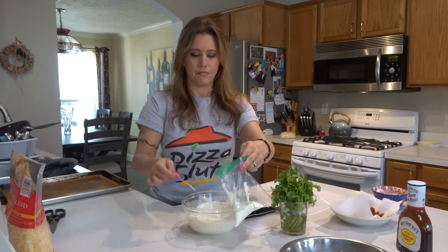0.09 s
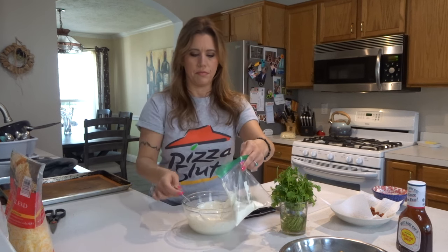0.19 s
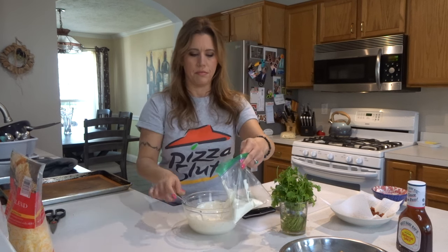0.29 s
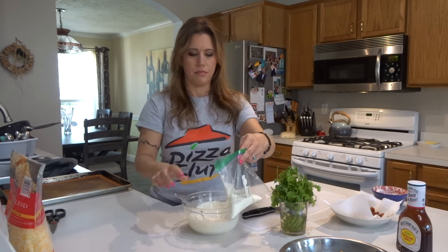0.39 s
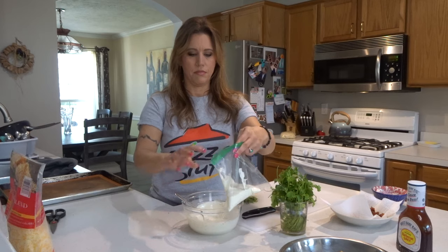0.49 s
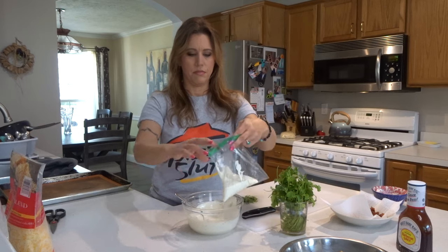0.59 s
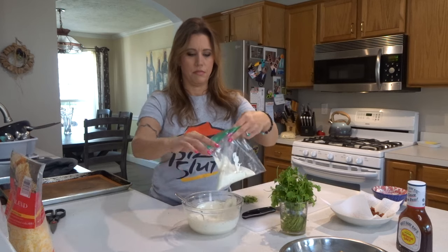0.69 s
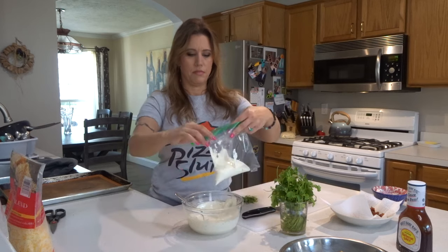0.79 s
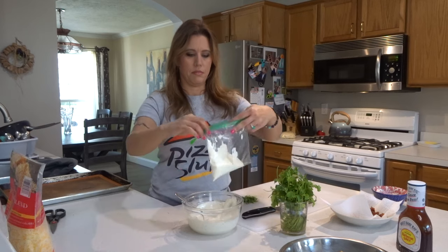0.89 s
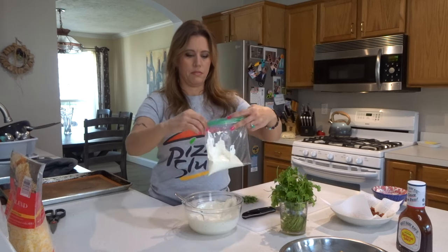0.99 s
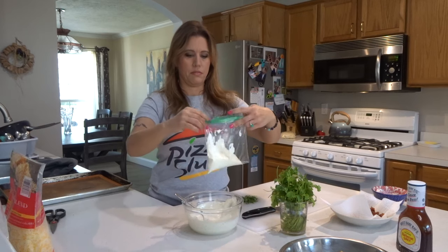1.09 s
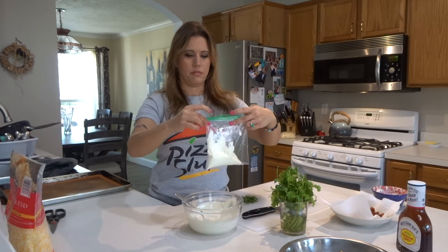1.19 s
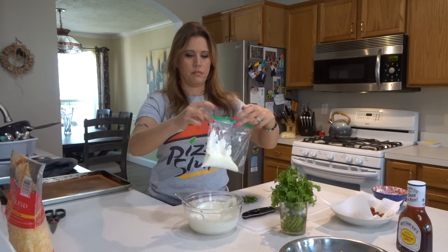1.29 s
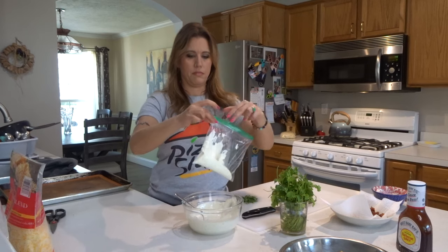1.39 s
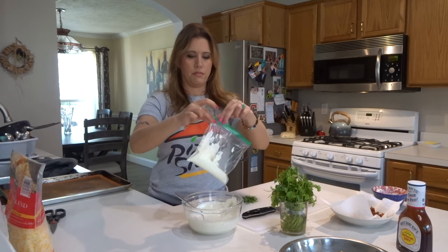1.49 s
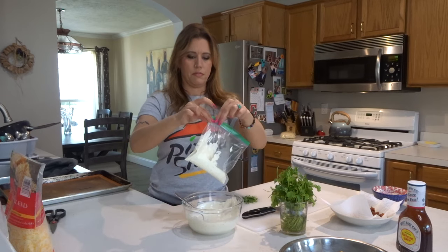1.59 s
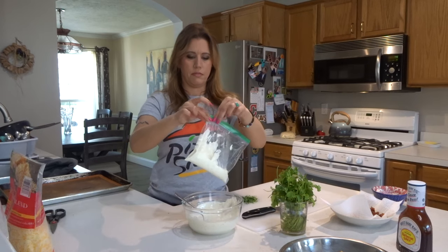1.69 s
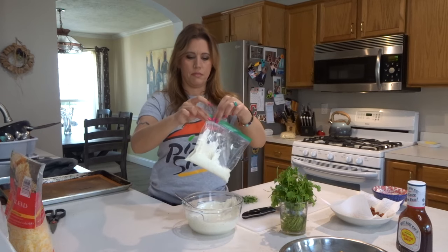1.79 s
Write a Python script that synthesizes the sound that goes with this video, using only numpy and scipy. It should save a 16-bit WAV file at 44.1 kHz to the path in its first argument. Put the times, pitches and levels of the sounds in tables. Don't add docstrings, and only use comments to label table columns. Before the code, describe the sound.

A spoon clinks against a glass bowl at about 0.24 seconds, chattering in several touches within 0.06 seconds, with a faint counter thump and a bright ring damped near 0.5. From 0.6 to 0.9 a plastic bag snaps and crinkles briskly, sharpest near 0.7 and 0.83. Lighter crackles follow, clustering around 1.2, then sparse ticks and a tiny squeak near 1.5. Close stereo, reflective kitchen, soft hum.

```python
import sys
import numpy as np
from scipy import signal
from scipy.fft import rfft, irfft, next_fast_len
from scipy.io import wavfile

SR = 44100
rng = np.random.default_rng(int(sys.argv[2]) if len(sys.argv) > 2 else 0)


def amplitude_ratio(level_db):
    exponent = np.asarray(level_db, float) / 20
    return 10 ** exponent


def waveform_to_disk(signal):
    frames = np.transpose(np.atleast_2d(signal))
    scaled = np.clip(frames, -1, 1) * 32767
    samples = np.round(scaled).astype(np.int16)
    wavfile.write(sys.argv[1], SR, samples)


N = 79380

# start_s, crack_db, clank_db, thud_db
SPOON_CONTACTS = [
    (0.2380, -11.5, -29, -37.5),
    (0.2431, -7, -24, -40.5),
    (0.2454, -4, -27.5, -49),
    (.2520, -10, -34.5, -33),
    (0.2622, -12, -51, -37.5),
    (.2770, -43, -34.5, -36),
    (0.2951, -8.5, -34, -52),
]
# start_s, pitch_hz, level_db, t60_s, left_lead_rad
GLASS_RINGS = [(.2520, 2796.3, -24, .7, .8), (.25214, 2809, -26.5, .7, -.7), (.2520, 2815, -19, .05, 0),
               (.2520, 1579, -36, .5, .2), (.2520, 1561, -39, .3, 0), (.2456, 4290, -30, .75, 1),
               (.24572, 4302, -33, .75, -1.4), (.2456, 4334, -37, .5, 1.9), (.2456, 4370, -25, .05, 0),
               (.2615, 4320, -20, .08, .3), (.2945, 4300, -17, .09, -.4), (.2450, 6151, -33, .45, -1),
               (.2450, 6138, -37, .5, -1.9), (.2450, 6175, -32, .12, 0), (.2450, 3790, -36, .1, 0),
               (.2520, 3295, -41, .4, .4), (.2520, 9322, -47, .18, 2), (.2456, 10685, -44, .2, -2)]
# start_s, pitch_hz, level_db, t60_s, left_lead_rad
COUNTER_HUMMING = [
    (.240, 133, -32.5, 0.432, 0.0081),
    (.250, 194, -39.5, 0.6, 0),
    (0.267, 367, -39, 0.65, 0),
    (.245, 304, -41.5, 0.56, 0),
    (0.21, 497, -46, 0.51, 0),
    (.245, 676, -36, .35, 0),
    (.25, 827, -39, .35, .2),
]
# pitch_hz, level_db, t60_s
CLANK_MODES = [(2060, -11, .025), (2918, -9, .02), (3144, -13, .025), (3295, -8, .025), (3790, -9, .025),
               (4125, -8, .02), (4330, -2, .03), (5650, -13, .02), (6150, -8, .03), (6500, -13, .015),
               (6950, -13, .02), (9310, -13, .025), (10660, -8, .025)]
# pitch_hz, level_db, t60_s
COUNTER_MODES = [(142.4, -16, 0.057), (296, -2.5, 0.022), (361, -12, 0.06), (416.7, -2.5, 0.031),
                 (490, 1.5, 0.051), (585, -4.5, 0.042), (660, -7, 0.032), (810, 0.5, 0.038),
                 (957, -8, 0.087), (1100, -22, 0.027)]
# pitch_hz, level_db
CRACK_COLOR = [(110, -30), (450, -3), (1200, -9), (2200, -10), (4500, -3), (5000, -20), (6300, -7),
               (7800, -24), (10700, -13)]
# start_s, peak_db, panel_pitch_hz, treble_over_panel_db
BAG_SNAPS = [(0.61, -32, 3140, -8), (0.624, -26, 3440, -6.5), (0.64, -29.5, 1534, -16),
             (0.6864, -28, 1800, -22), (0.6965, -24, 1580, -25), (0.698, -12.5, 2200, -10),
             (0.7088, -25.5, 2940, -19), (0.7280, -26.5, 2840, 5.5), (0.7573, -35, 3340, 8),
             (.762, -31, 2950, 7), (.7686, -28, 2680, 4), (.786, -30, 4760, 6), (0.801, -24, 3000, 5),
             (0.8143, -30, 3630, -12), (0.8331, -16.5, 3430, 0.5), (0.8429, -19, 2050, 0),
             (.849, -28, 2890, 7), (0.859, -26, 2890, 2), (0.8735, -45, 2950, -1.5),
             (0.9317, -30, 2930, 13), (0.9945, -34.5, 4940, 9), (1.0595, -37, 2900, -16),
             (1.1311, -27, 3380, 1), (1.1913, -34.5, 3000, 4.5), (1.2075, -25.5, 3240, -18),
             (1.221, -30, 3000, -11), (1.2855, -37, 3640, -15), (1.4997, -35, 3815, -5),
             (1.5302, -36.5, 2213, -1.5), (1.6683, -34.5, 2230, 1.5),
             (0.594, -47, 2860, -5), (0.6605, -37, 2000, -0.5), (.6775, -34, 1800, 0),
              (0.7022, -24.5, 2180, -17), (.7130, -32, 2000, -14), (.7160, -47, 2420, -11),
              (.7428, -36, 2250, 7), (0.766, -31, 3020, 8.5), (.8097, -46.5, 3000, -4),
              (0.8568, -27, 3040, 0), (0.88, -32, 1950, -9.5), (0.8924, -33, 2880, -7),
              (.9057, -47, 2200, -6), (0.9232, -33, 2560, 2), (1.0787, -37, 3280, 9),
              (1.0948, -33, 3350, -0.5), (1.114, -42, 3000, -5), (1.1610, -38, 1900, 4),
              (1.1960, -41, 2980, 10), (1.2023, -33, 3560, -12), (1.2169, -28.5, 3320, -8.5),
              (1.2288, -36.5, 3230, -12), (1.2342, -33, 2860, -19), (1.262, -34, 4260, -4)]
# pitch_hz, level_db
TICK_COLOR = [(800, -43), (2000, -5.5), (7500, -1.5), (11000, -7.5)]
# start_s, rise_s, fall_db_per_s, peak_db
HAND_STROKES = [(0.607, 0.018, 602, -43.5), (.69, 0.0086, 399, -36.5), (.745, 0.0215, 300, -40),
                (0.789, 0.021, 208, -42), (0.822, 0.025, 698, -31.5), (0.904, 0.038, 400, -46),
                (.97, 0.023, 497.5, -47), (1.033, 0.032, 247, -45.5), (1.07, 0.032, 296, -47),
                (1.187, 0.018, 600, -43.5), (1.206, 0.026, 702, -43.5), (1.25, 0.033, 404, -53.5),
                (1.522, 0.026, 175, -50.5), (1.649, 0.014, 303, -55)]
# pitch_hz, level_db_per_hz
FILM_COLOR = [(500, 5.5), (1100, 0), (1800, -1), (3400, -0.5), (4500, -2), (8000, -7), (11000, -10.5)]
# pitch_hz, t60_s
KITCHEN_T60 = [(150, 0.416), (600, 0.66), (2000, 0.66), (5000, 0.64), (11000, 0.34)]
# pitch_hz, likeness (0 to 1)
LEFT_RIGHT_LIKENESS = [(60, .98), (250, .96), (500, .9), (1000, .8), (4000, .4), (11000, .1)]
# pitch_hz, level_db_per_hz
AIR_COLOR = [(18, -45), (30, -18.5), (60, -6), (81, -16), (112, -4), (552, -12.5), (1220, -20.5),
             (4470, -27), (11500, -36), (15000, -79), (22000, -120)]
# pitch_hz, level_db, width_hz
HUM_LINES = [(52.8, -62, 1.1), (118, -69, 4.8), (249.14, -58, 15.5), (319.5, -60.5, 22), (400, -62, 19),
             (563.3, -66, 3.3), (670.4, -68.5, 2.1), (952, -69, 19)]

CRACK_T60_S, CRACK_RISE_S = 0.021, 0.001
RING_DB, RING_RISE_S = 1, 0.001
SETTLE_S, SETTLE_LASTS_S, SETTLE_DB = 0.482, 0.015, -8
RING_ROOM_DB, CLINK_ROOM_DB, THUD_ROOM_DB, BAG_ROOM_DB = -19, 4, 7.5, -6.5
SNAP_RISE_S, SNAP_T60_S, TICK_T60_S, SNAP_DB = 0.00054, 0.0069, 0.0069, -3
SECOND_PANEL_RATIO, SECOND_PANEL_DB, PANEL_SPLIT_HZ = 1.5, -3, 2500
CREASES_PER_S, CREASE_CYCLES, CREASE_DB = 5500, 2.1, -2.5
SIZE_SPREAD_DB, BIGGEST_DB = 3.2, 9
SQUEAK_S, SQUEAK_LENGTH_S = 1.53, 0.065
SQUEAK_HZ, SQUEAK_WIDTH_HZ, SQUEAK_DB = 2150, 80, -57
PORT_LAG_S, WALL_S = 3e-5, 0.004
RUMBLE_CUT_HZ, LEAN_DB = 99, -0.5
TOP_LEVEL, TOP_KNEE, TOP_HZ, EDGE_HZ = 0.51, 3.1, 11015, 47


def unit(x):
    return x / np.sqrt(np.mean(x ** 2) + 1e-20)


def along(points, hz):
    f, v = np.transpose(points)
    return np.interp(np.log(hz + 1), np.log(f + 1), v)


def filtered(x, response):
    m = next_fast_len(x.shape[-1] + 8192)
    spectrum = rfft(x, m) * response(np.fft.rfftfreq(m, 1 / SR))
    return irfft(spectrum, m)[..., :x.shape[-1]]


def add(track, s, sound):
    part = track[round(s * SR):][:len(sound)]
    part += sound[:len(part)]


def noise_line(shape, hz, width):
    return unit(filtered(rng.standard_normal(shape), lambda f: 1 / (1 + ((f - hz) / width) ** 2)))


def clink():
    left, right, knocks, cracks, thuds = np.zeros((5, N))
    t = np.arange(SR) / SR
    for s, hz, db, t60, lead in GLASS_RINGS + COUNTER_HUMMING:
        rest_db = SETTLE_DB * np.clip((t + s - SETTLE_S) / SETTLE_LASTS_S, 0, 1)
        fade = amplitude_ratio(RING_DB + db + rest_db - 60 * t / t60) * (1 - np.exp(-t / RING_RISE_S))
        add(left, s, fade * np.sin(2 * np.pi * hz * t + lead / 2))
        add(right, s, fade * np.sin(2 * np.pi * hz * t - lead / 2))

    crack_t = t[:2000]
    crack_rise = 1 - np.exp(-crack_t / CRACK_RISE_S)
    for s, crack_db, clank_db, thud_db in SPOON_CONTACTS:
        add(knocks, s, amplitude_ratio(clank_db) * struck(CLANK_MODES, t[:9000]))
        add(thuds, s, amplitude_ratio(thud_db - 3) * struck(COUNTER_MODES, t[:9000]))
        crack_fade = amplitude_ratio(crack_db - 60 * crack_t / CRACK_T60_S)
        add(cracks, s, crack_fade * crack_rise * rng.standard_normal(2000))
    knocks = knocks + filtered(cracks, lambda hz: amplitude_ratio(along(CRACK_COLOR, hz)))

    ring_room = amplitude_ratio(RING_ROOM_DB) * kitchen(left)
    knock_room = kitchen(amplitude_ratio(CLINK_ROOM_DB) * knocks + amplitude_ratio(THUD_ROOM_DB) * thuds)
    return np.array([left, right]) + ports(knocks + thuds, -0.41) + ring_room + knock_room


def struck(modes, t):
    hz, db, t60 = np.transpose(modes)[..., None]
    level = amplitude_ratio(db + rng.normal(0, 1.8, hz.shape) - 60 * t / t60)
    return (level * np.sin(2 * np.pi * hz * t)).sum(0)


def bag():
    pops, left, right = snaps(), crinkle(), crinkle()
    film = pops + left + right
    stretch = np.arange(N) * 6 // N
    wet = sum(kitchen(film * (stretch == k)) for k in range(6))
    return ports(pops + left, 0.44) + ports(right + squeak(), -1.22) + amplitude_ratio(BAG_ROOM_DB) * wet


def snaps():
    panels, ticks = np.zeros((2, N))
    t = np.arange(1200) / SR
    rise = 1 - np.exp(-t / SNAP_RISE_S)
    for s, db, hz, treble_db in BAG_SNAPS:
        second_hz = hz * SECOND_PANEL_RATIO ** np.sign(PANEL_SPLIT_HZ - hz)
        tone = np.sin(2 * np.pi * hz * t) + amplitude_ratio(SECOND_PANEL_DB) * np.sin(2 * np.pi * second_hz * t)
        panel = tone * amplitude_ratio(-60 * t / SNAP_T60_S) * rise
        add(panels, s, amplitude_ratio(db + SNAP_DB) * panel / abs(panel).max())
        tick_fade = amplitude_ratio(db + SNAP_DB + treble_db + 5 - 60 * t / TICK_T60_S)
        add(ticks, s, tick_fade * rise * rng.choice([-1, 1], len(t)))
    return panels + filtered(ticks, lambda hz: amplitude_ratio(along(TICK_COLOR, hz)))


def crinkle():
    draw = rng.random((int(CREASES_PER_S * N / SR), 3))
    t = np.arange(200) / SR
    hz = 1300 * 8.96 ** draw[:, 1:2]
    size = amplitude_ratio(np.minimum(-SIZE_SPREAD_DB * np.log(draw[:, 2:]), BIGGEST_DB))
    grains = size * np.sin(2 * np.pi * hz * t) * np.exp(-t * hz / CREASE_CYCLES) * np.sqrt(hz)
    at = (draw[:, :1] * N).astype(int) + np.arange(200)
    creases = np.bincount(at.ravel(), grains.ravel())[:N]
    steady = unit(filtered(creases, lambda f: amplitude_ratio(along(FILM_COLOR, f)) * np.sqrt(f / 1000)))

    now, effort = np.arange(N) / SR, np.zeros(N)
    for s, rise, fall, db in HAND_STROKES:
        swell = np.clip((now - s) / rise, 0, 1) ** 2
        effort += swell * amplitude_ratio(db - fall * np.maximum(now - s - rise, 0))
    return steady * amplitude_ratio(CREASE_DB) * effort


def squeak():
    t = np.arange(N) / SR - SQUEAK_S
    swell = np.sin(np.pi * np.clip(t / SQUEAK_LENGTH_S, 0, 1)) ** 0.5
    return amplitude_ratio(SQUEAK_DB) * noise_line(N, SQUEAK_HZ, SQUEAK_WIDTH_HZ) * swell


def ports(x, side):
    lead_s = side * PORT_LAG_S * np.array([[1], [-1]])
    return filtered(np.array([x, x]), lambda hz: np.exp(1j * np.pi * hz * lead_s))


def kitchen(x):
    hz, t, z = signal.stft(rng.standard_normal((2, SR)), SR, nperseg=256)
    fade = amplitude_ratio(-60 * t / along(KITCHEN_T60, hz)[:, None])
    tail = signal.istft(z * fade, SR, nperseg=256)[1]
    tail = paired(tail / np.linalg.norm(tail[0]))
    late = np.pad(x, (round(WALL_S * SR), 0))
    return signal.fftconvolve(late[None], tail, axes=1)[:, :N]


def paired(pair):
    def turn(hz):
        return np.arccos(np.clip(along(LEFT_RIGHT_LIKENESS, hz), -1, 1)) / 2

    mid, side = filtered(pair, lambda hz: np.array([np.cos(turn(hz)), np.sin(turn(hz))]))
    return np.array([mid + side, mid - side])


def floor():
    air = unit(filtered(rng.standard_normal((2, N)), lambda hz: amplitude_ratio(along(AIR_COLOR, hz))))
    hum = sum(amplitude_ratio(db) * noise_line((2, N), hz, width) for hz, db, width in HUM_LINES)
    return paired(amplitude_ratio(-53) * air + hum)


def scene():
    rumble_cut = signal.butter(4, RUMBLE_CUT_HZ, "high", fs=SR, output="sos")
    near = signal.sosfilt(rumble_cut, clink() + bag())
    return near * amplitude_ratio([[LEAN_DB / 2], [-LEAN_DB / 2]]) + floor()


def roll_off(x):
    return signal.sosfilt(signal.butter(12, 12160, fs=SR, output="sos"), x)


def record(dry):
    x = dry / (1 + abs(dry / TOP_LEVEL) ** TOP_KNEE) ** (1 / TOP_KNEE)
    x = filtered(x, lambda hz: 1 / (1 + np.exp(np.clip((hz - TOP_HZ) / EDGE_HZ, -50, 50))))
    return roll_off(x)


dry = scene()
out = record(dry)
waveform_to_disk(out)
```